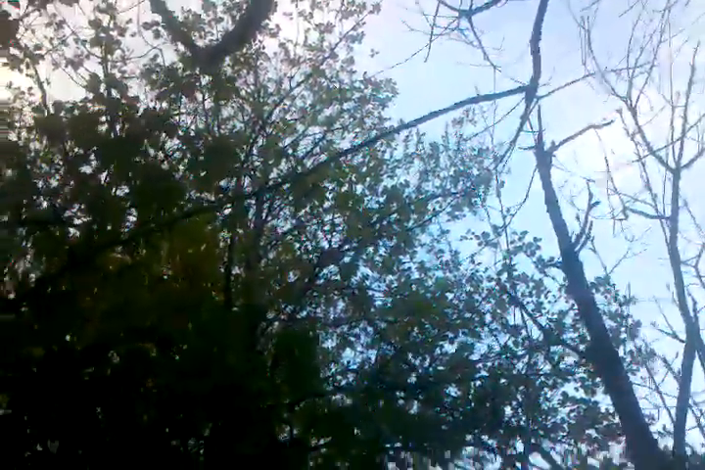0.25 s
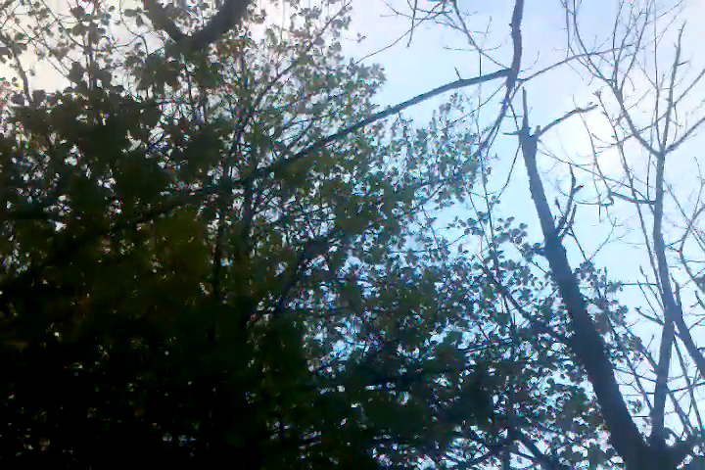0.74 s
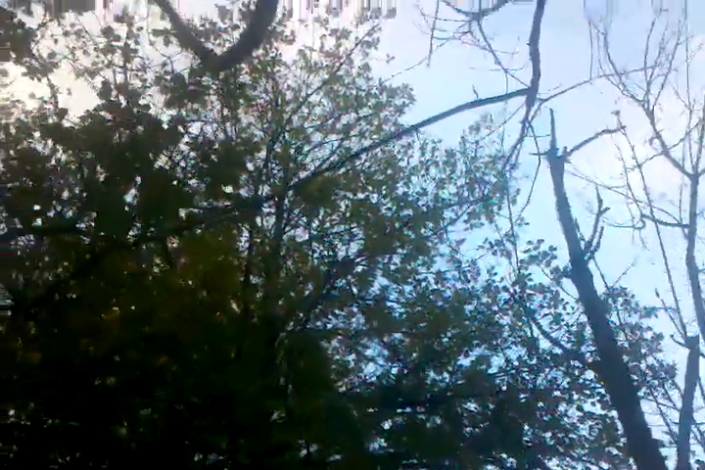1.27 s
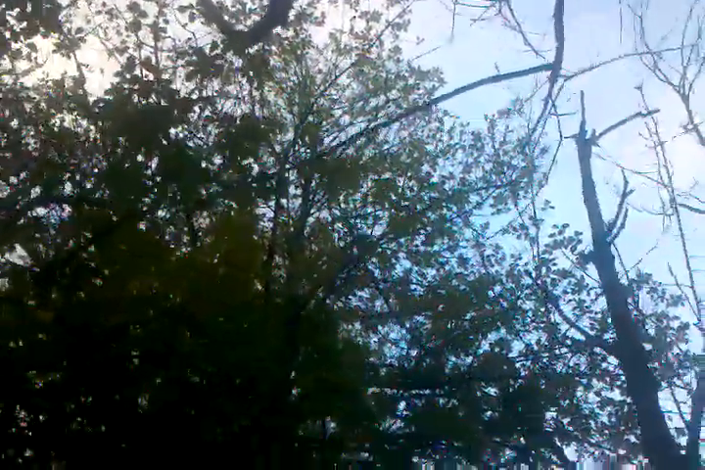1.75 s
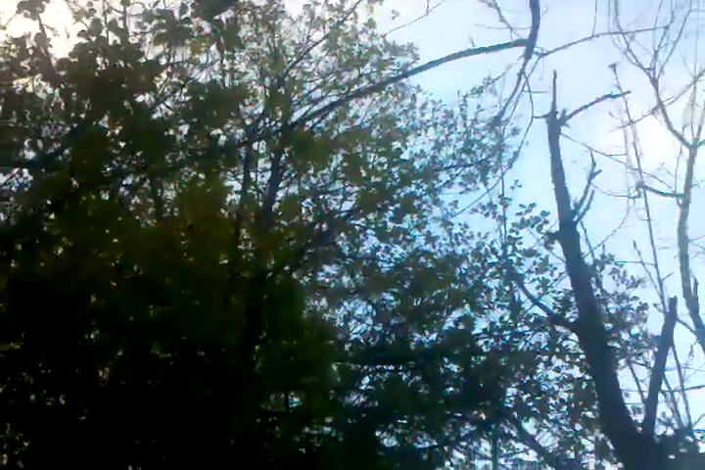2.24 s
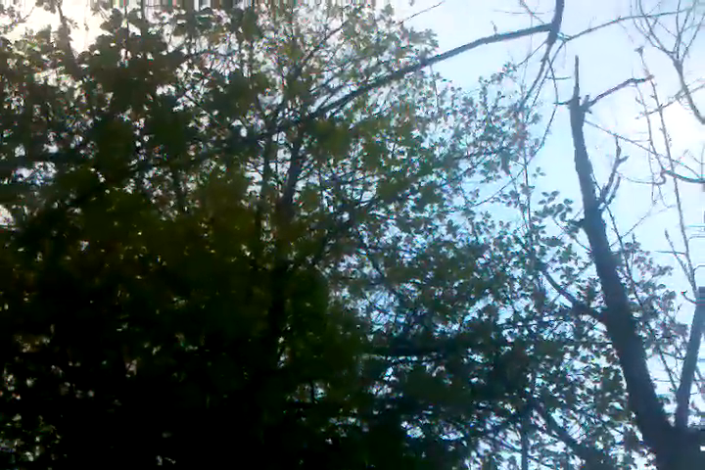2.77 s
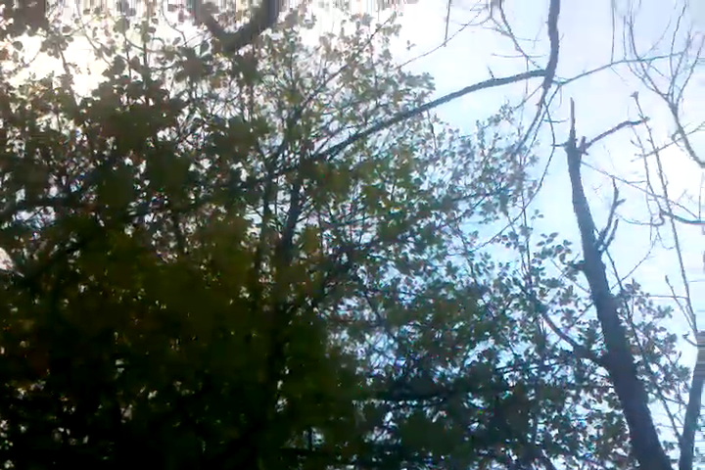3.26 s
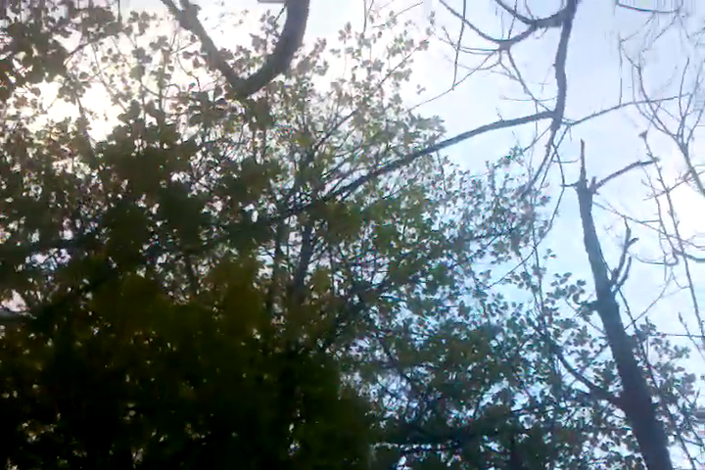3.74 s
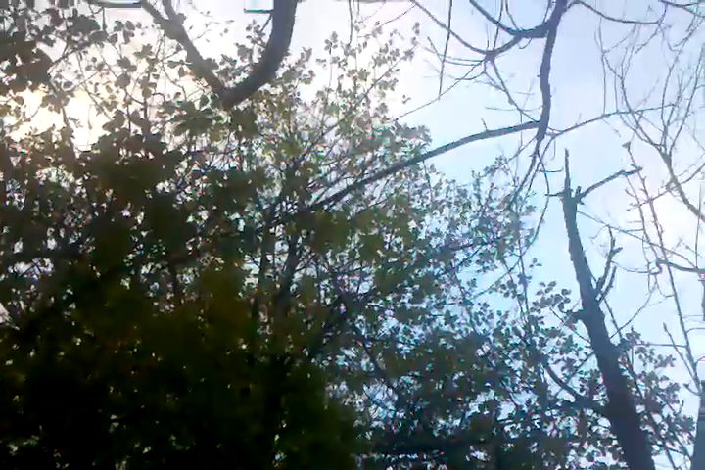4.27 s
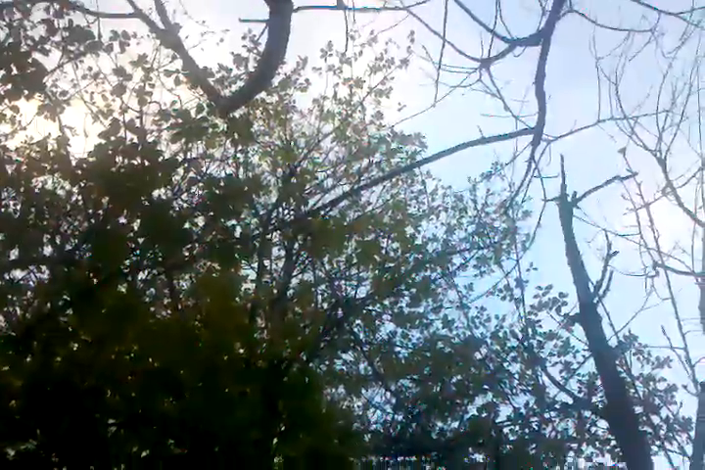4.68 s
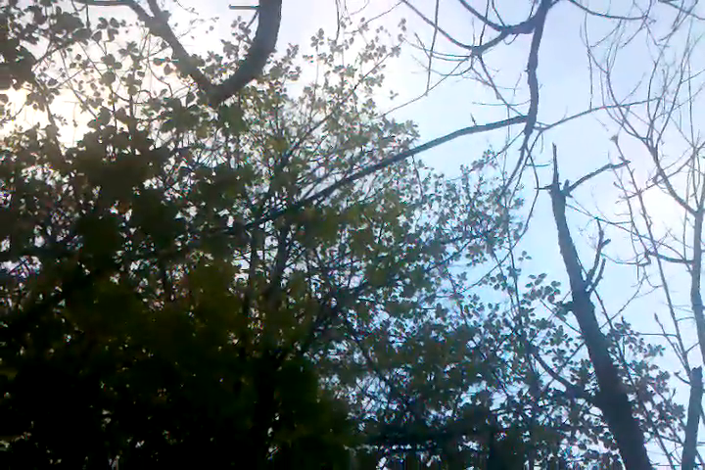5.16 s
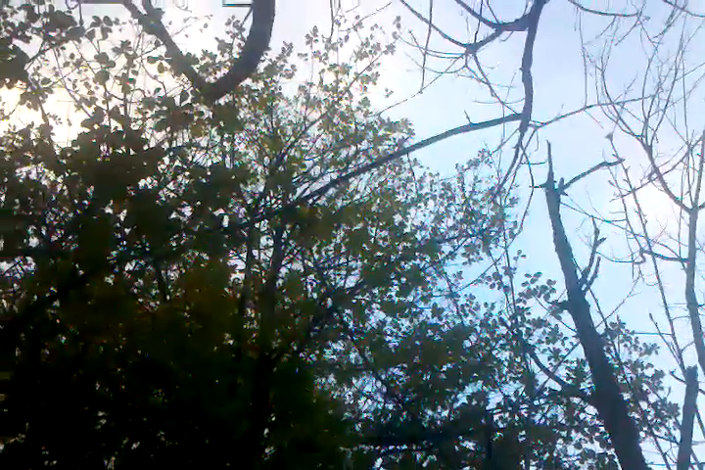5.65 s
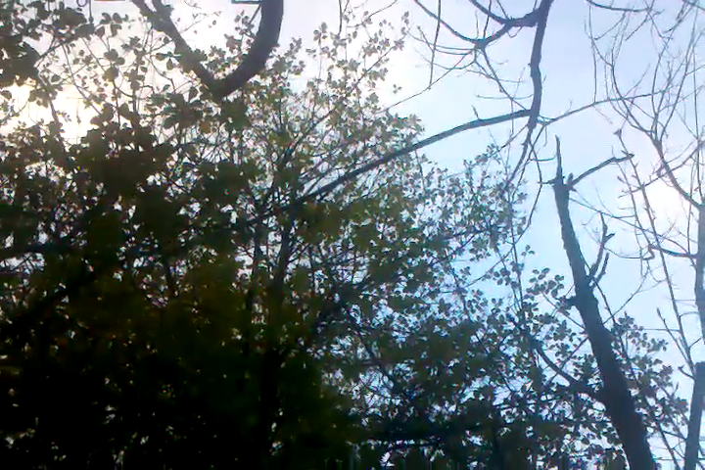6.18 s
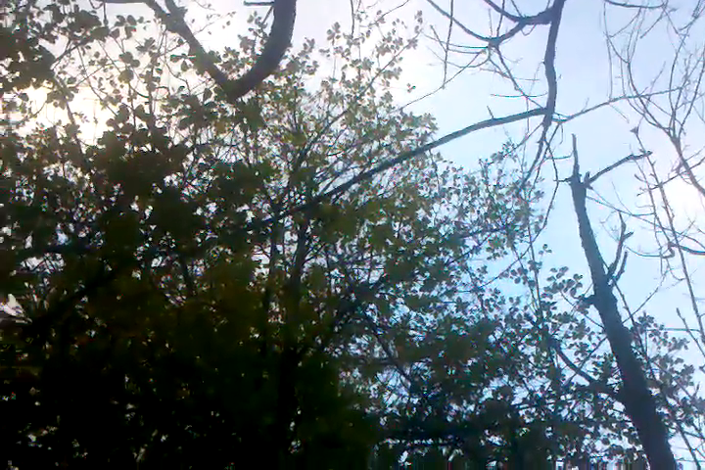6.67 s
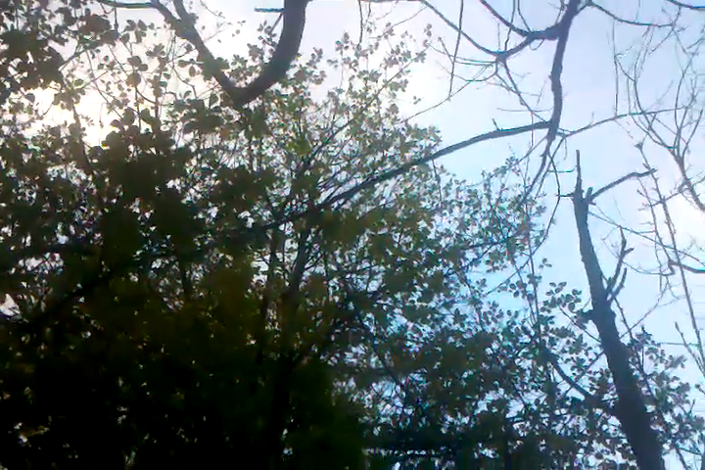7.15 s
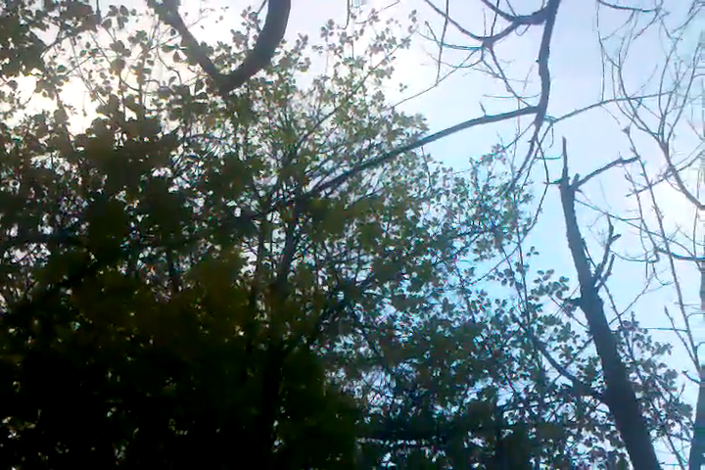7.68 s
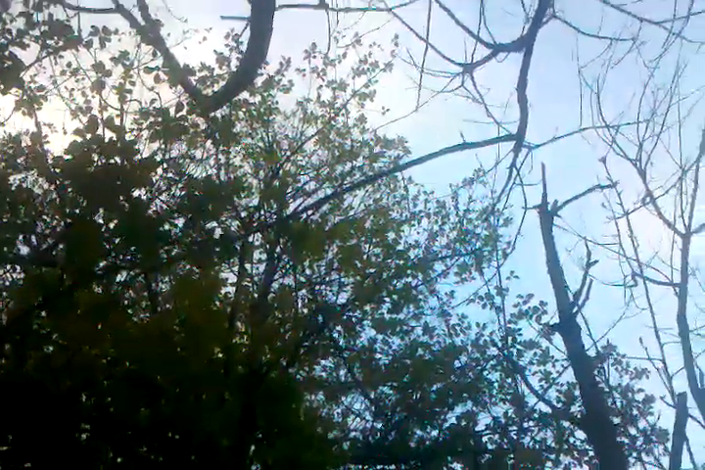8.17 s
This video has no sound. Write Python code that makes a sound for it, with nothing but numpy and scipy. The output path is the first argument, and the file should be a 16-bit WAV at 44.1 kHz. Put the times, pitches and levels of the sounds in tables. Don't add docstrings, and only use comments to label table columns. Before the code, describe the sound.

A close mockingbird runs through repeated chirps, buzzy falling notes, peaked whistles, fast trills and sharp chips over soft street rumble and a low hum.

```python
import sys
import numpy as np
from scipy import signal
from scipy.fft import rfft, irfft, next_fast_len
from scipy.io import wavfile
from scipy.ndimage import uniform_filter1d

SR = 44100
rng = np.random.default_rng(int(sys.argv[2]) if len(sys.argv) > 2 else 0)


def pcm_store(signal):
    levels = np.round(np.clip(np.atleast_2d(signal), -1, 1) * 32767)
    wavfile.write(sys.argv[1], SR, levels.astype(np.int16).T)


def elevation(decibels):
    levels = np.asarray(decibels, float)
    return 10 ** (levels / 20)


N = 371322
TIME = np.arange(N) / SR

# share of length, share of glide, level/dB
SLIDE = [(0, 0, -3), (.2, 0.31, 2.5), (.7, 0.91, 0), (1, 0.85, 0)]


def shaped(x, points):
    hz, db = np.transpose(points)
    size = next_fast_len(N)
    bins_hz = np.maximum(np.fft.rfftfreq(size, 1 / SR), 1)
    gain = elevation(np.interp(np.log(bins_hz), np.log(hz), db))
    return irfft(rfft(x, size) * gain, size)[:N]


def unit(x):
    return x / np.sqrt(np.mean(x ** 2))


def walk(rate_hz, size=N):
    hold = int(SR / rate_hz)
    steps = np.repeat(rng.standard_normal(size // hold + 1), hold)
    return 1.32 * uniform_filter1d(uniform_filter1d(steps, hold), hold)[:size]


def street():
    # f/Hz, density/dB per Hz
    bed_colour = [(25, -53.5), (45, -35.5), (70, -19), (110, -6.5), (190, -2), (450, -7.5), (700, -5.5),
                  (970, -1), (1350, -4), (1760, -7), (2230, -14), (6600, -16.5), (7100, -23.5),
                  (7600, -37.5), (8100, -61)]
    # t/s, engines/dB, tyres/dB, leaf hiss/dB
    swell = [(0.0, -46, -45.5, -57.5), (0.909, -45, -43.5, -52), (4.241, -46, -43, -57),
             (6.171, -45, -43.5, -52), (8.35, -44, -42.5, -54), (8.42, -43, -43.5, -52)]
    # t/s, level/dB
    gusts = [(0, -81), (3.9, -77), (5.3, -73.5), (5.6, -69.5), (6.2, -65), (6.6, -71), (6.9, -76.5),
             (7.5, -70), (8.42, -75)]
    # f/Hz, level/dB
    mains = [(118.4, -56)]
    s, *columns = np.transpose(swell)
    engines_db, tyres_db, leaves_db = (np.interp(TIME, s, c) for c in columns)
    bed = shaped(rng.standard_normal(N), bed_colour)
    low, mid, high = (signal.sosfiltfilt(signal.butter(8, hz, fs=SR, output="sos"), bed)
                      for hz in (700, 1900, 7500))
    buffet_colour = [(20, -44.5), (35, -23.0), (55, -2.5), (80, -11.0), (130, -43.0)]
    buffet = shaped(rng.standard_normal(N), buffet_colour)
    out = elevation(np.interp(TIME, *np.transpose(gusts)) + 1.5 * walk(5.2)) * unit(buffet)
    mic_hiss_db = -104
    layers = [(engines_db, low), (tyres_db, mid - low), (leaves_db + 6, high - mid), (mic_hiss_db, bed - high)]
    for db, band in layers:
        out += elevation(db + 0.7 * walk(9)) * unit(band)
    hum_hz, hum_db = mains[0]
    hum_level = elevation(hum_db + 2.5 + 1.7 * walk(3.2))
    return out + hum_level * np.sin(2 * np.pi * np.cumsum(hum_hz + 2.537 * walk(3)) / SR)


def ticks():
    # t/s, peak/dB, centre f/Hz, width/Hz
    snaps = [(0.36, -22, 1190, 1100), (0.382, -31, 4000, 1200), (.385, -32, 4400, 1000),
             (4.4504, -22.5, 2180, 820), (4.452, -21.5, 1094, 610), (6.237, -29, 4130, 1500),
             (4.451, -26, 4680, 900), (6.932, -25.5, 890, 400), (7.0485, -31.5, 3430, 900),
             (7.05, -30, 1310, 250), (7.093, -39, 1150, 200), (7.14, -34, 1000, 200),
             (7.161, -33.5, 1050, 200), (2.335, -37, 1103, 200), (2.578, -32.5, 900, 200),
             (2.614, -38, 1092, 200), (7.283, -30, 3300, 1190), (1.529, -29.5, 4150, 2485),
             (2.202, -33, 6000, 2490)]
    out, t = np.zeros(N), np.arange(300) / SR
    for s, db, hz, width_hz in snaps:
        ring = np.sin(2 * np.pi * hz * t) * t * np.exp(-5 * width_hz * t)
        crack = elevation(-17) * np.exp(-t / .0004) * rng.standard_normal(len(t))
        start = int(s * SR)
        out[start:start + len(t)] += elevation(db) * (ring / np.max(ring) + crack)
    return out


def throat(hz):
    # f/Hz, gain/dB
    resonance = [(1200, -36.5), (2200, -4), (3000, 0), (3700, 3), (4400, -9.5), (5400, -18.5),
                 (6200, -12.5), (7000, -10.5)]
    f, g = np.transpose(resonance)
    return np.interp(np.log(hz), np.log(f), g)


def add(out, t, hz, db, orders, waver=0.0026, throb_hz=90., throb=0., rough=0., grain_db=2.0):
    phase = 2 * np.pi * np.cumsum(hz * (1 + (waver + rough) * walk(900, size=len(t)))) / SR
    gains = [elevation(d + throat(k * hz)) * (k * hz < 9400) for k, d in orders]
    partials = sum(a * np.sin(k * phase) for a, (k, _) in zip(gains, orders))
    tone = partials / np.sqrt(sum(a ** 2 for a in gains) / 2)
    pulse = 1 - np.clip(throb, 0, 1) * np.cos(np.pi * throb_hz * (t - t[0])) ** 2
    edge = np.clip(np.minimum(t - t[0], t[-1] - t) / 0.0049, 0, 1)
    sung = tone * elevation(db + grain_db * walk(250, size=len(t))) * pulse * edge
    i = int(t[0] * SR)
    out[i:i + len(t)] += sung[:N - i]


def phrase(notes, orders, flutter=0., **voice):
    out = np.zeros(N)
    for note in notes:
        s, hz, db = np.transpose(note)
        t = np.arange(s[0] - .003, s[-1] + 0.0066, 1 / SR)
        pitch = uniform_filter1d(np.interp(t, s, hz), size=130)
        rising = uniform_filter1d(1. * (t < s[np.argmax(hz)]), size=130)
        add(out, t, pitch, np.interp(t, s, db), orders, rough=flutter * rising, **voice)
    return out


def repeats(shape, calls):
    return [[(s + at, hz * factor, db + level) for s, hz, db in shape] for at, level, factor in calls]


def humps(shape, rows):
    return [[(top + u * (rise if u < 0 else fall), hz * ratio, db + level) for u, ratio, db in shape]
            for top, rise, fall, hz, level in rows]


def glides(shape, rows):
    return [[(at + u * length, a + (b - a) * share, db + level) for u, share, db in shape]
            for at, length, a, b, level in rows]


def far_birds():
    # t/s, f/Hz, level/dB
    slur = [(0, 4202.5, -4.5), (.014, 5597.5, 7), (.022, 5298, 0.5), (.026, 4447.5, 4), (.045, 4246.5, 7),
            (.052, 3997.5, -12.5), (.065, 3699.5, 1), (.09, 3443, -3), (.125, 4095.5, -6)]
    # t/s, level/dB, pitch factor
    slur_calls = [(0.779, -50, 0.92), (2.205, -46, 0.99), (3.362, -43, 0.99), (4.635, -42.5, 0.98),
                  (5.539, -42.5, 0.97), (7.706, -40, 1.0)]
    # t/s, length/s, from f/Hz, to f/Hz, level/dB
    twitters = [(0.578, .3, 5930, 5610, -51.5), (0.841, 0.051, 3730, 3640, -45.5),
                (2.33, 0.064, 4210, 3630, -48), (7.682, 0.033, 5690, 6500, -57.5),
                (7.472, .045, 3850, 3500, -49), (5.935, 0.025, 3750, 3450, -48.5),
                (8.142, 0.081, 3520, 2920, -52)]
    twitter = phrase(glides(SLIDE, twitters), [(1, 0)], waver=.11)
    slurred = phrase(repeats(slur, slur_calls), [(0.98, 0)], waver=0.033, throb_hz=75.0, throb=0.56)
    return slurred + twitter


def chirper():
    # t/s, f/Hz, level/dB
    chirp = [(0, 2249, -15), (.015, 2418.5, -10), (.027, 2472, -0.5), (.034, 2195.5, -9), (.042, 1905, -10)]
    # t/s, level/dB, pitch factor
    chirp_calls = [(3.912, -39.5, 0.98), (4.143, -41.5, 0.94), (4.725, -36, 0.98), (4.93, -42.5, 0.93),
                   (5.548, -42.5, 0.96), (5.81, -43, 0.92), (6.33, -37, 0.99), (6.92, -40.5, 0.96)]
    # t/s, length/s, from f/Hz, to f/Hz, level/dB
    lead_ins = [
        (3.905, 0.028, 2000, 6900, -59),
        (6.312, .018, 2850, 3300, -48),
        (5.79, 0.03, 2200, 2600, -51.5),
    ]
    chirps = phrase(repeats(chirp, chirp_calls), [(1, 2.0), (2, -4.5)], waver=.018)
    return chirps + phrase(glides(SLIDE, lead_ins), [(0.99, 0)], waver=.015)


def murmurs():
    # t/s, length/s, from f/Hz, to f/Hz, level/dB
    links = [(7.386, 0.057, 2030, 2046, -45), (7.88, 0.085, 2020, 2165, -42),
             (9.8, 0.023, 3300, 2690, -42.5), (4.241, 0.02, 2700, 3600, -51.5),
             (3.1, 0.012, 4100, 2600, -46), (7.29, .012, 2100, 2620, -44), (5.046, 0.029, 3800, 3670, -51),
             (4.8, 0.01, 2500, 2900, -41)]
    return phrase(glides(SLIDE, links), [(0.99, 0)], waver=0.0054, throb_hz=45., throb=0.16)


def arches():
    # place (-1 start, 0 top, 1 end), pitch / top pitch, level/dB
    short_arch = [(-1, .78, -11), (-0.61, .93, -9.5), (-.45, .965, -4), (-0.039, 1.001, -2.1),
                  (0.24, .88, -2.5), (0.66, .69, -11.5), (1, 0.39, -13)]
    long_arch = [(-1, .68, -6), (-.8, 0.82, -8), (-0.47, .965, -4.5), (0.043, 1.001, -1.5), (.3, .89, -4.5),
                 (0.47, 0.82, 2), (0.94, 0.44, -13)]
    # top t/s, rise/s, fall/s, top f/Hz, level/dB
    short_rows = [(0.101, 0.018, 0.029, 1376, -33.5), (0.257, 0.018, 0.028, 1386, -37.5),
                  (0.416, 0.021, .029, 1364, -33.5), (0.568, 0.014, .033, 1403, -34),
                  (0.727, 0.026, 0.024, 1435, -33)]
    long_rows = [(.906, .016, 0.04, 1600, -35), (1.094, 0.028, 0.025, 1622, -32.5),
                 (1.242, 0.024, 0.028, 1592, -31), (1.421, 0.028, 0.028, 1648, -31.5),
                 (1.955, 0.034, 0.026, 1618, -31.5), (2.135, 0.03, 0.025, 1594, -34)]
    # t/s, f/Hz, level/dB
    step_arch = [(1.565, 1130, -35), (1.576, 1333, -38), (1.582, 1763, -27.5), (1.601, 1900, -28.5),
                 (1.608, 1644, -29.5), (1.615, 1260, -42), (1.627, 900, -48)]
    cracked_arch = [(1.733, 1106, -40), (1.745, 1303, -31), (1.75, 1810, -30), (1.754, 1776, -28),
                    (1.76, 1610, -38), (1.768, 1626, -25.5), (1.772, 1268, -29.5), (1.782, 970, -35),
                    (1.79, 742, -39)]
    long_upper_db = [-6.5, 3, 4, 3, 3, 2, 0, 5.5]
    upper_dbs = [2] * len(short_rows) + long_upper_db
    notes = humps(short_arch, short_rows) + humps(long_arch, long_rows) + [step_arch, cracked_arch]
    out = np.zeros(N)
    for note, upper_db in zip(notes, upper_dbs):
        orders = [(2, 0.91), (3, upper_db), (4, upper_db - 5.5), (5, upper_db - 8.5)]
        out += phrase([note], orders, waver=0.011, grain_db=2.5)
    return out


def buzz_falls():
    # place, pitch / top pitch, level/dB
    buzz = [(-1, .88, -15), (-0.376, .95, -9), (-0.0097, 1.001, -1.4), (0.96, 1.01, -4)]
    buzz_rows = [(2.976, 0.028, 0.0097, 2940, -28.5), (3.098, 0.022, 0.015, 3044, -27),
                 (3.215, 0.017, 0.018, 2960, -27.5), (3.353, 0.035, 0.0044, 2975, -27.5),
                 (3.469, 0.021, 0.022, 2920, -29.5), (3.618, 0.031, 0.015, 3018, -24.5)]
    # share of length, share of glide, level/dB
    fall = [(0, 0.042, -13), (.2, 0.34, -1.7), (.6, .76, 0.8), (1, 0.98, -12.5)]
    # t/s, length/s, from f/Hz, to f/Hz, level/dB
    fall_rows = [(2.99, 0.024, 4650, 2710, -28.5), (3.122, 0.024, 5050, 2845, -26.5),
                 (3.243, .025, 4840, 2814, -26.5), (3.369, 0.026, 4910, 2850, -24),
                 (3.499, 0.035, 4610, 3124, -28), (3.638, .033, 4870, 2950, -26)]
    buzzes = phrase(humps(buzz, buzz_rows), [(1, 0), (2, -2)], throb_hz=80., throb=.72, waver=.02, grain_db=3)
    return buzzes + phrase(glides(fall, fall_rows), [(1, 1), (2, -10.0)])


def flicks(peaked):
    ends_s = [note[-1][0] for note in peaked]
    return [[(s - .011, 7400, -46), (s - .001, 6000, -50), (s + 0.007, 4000, -52)] for s in ends_s]


def whistles():
    # place, pitch / top pitch, level/dB
    low_peak = [(-1, .71, -15), (-.8, .81, -7), (-.35, .96, -10), (0, 1, -10), (.17, .84, -3),
                (.45, .76, 1), (.7, .7, -1), (1, .58, -11)]
    high_peak = [(-1, .72, -10), (-.75, .76, -4), (-.45, .8, -6), (-.27, .97, -11), (0, 1, -9),
                 (.2, .8, -4), (.4, .71, 1), (.7, .63, -1), (1, .53, -11)]
    # top t/s, rise/s, fall/s, top f/Hz, level/dB
    low_rows = [
        (4.316, 0.025, 0.033, 5000, -29.5),
        (4.434, .039, .027, 5220, -27.5),
        (5.113, 0.031, .029, 5160, -30),
    ]
    high_rows = [
        (5.222, .036, .024, 5805, -28.5),
        (5.36, .035, 0.017, 5780, -27),
    ]
    # t/s, f/Hz, level/dB
    hushed_peak = [(4.505, 4030, -46), (4.514, 4580, -34), (4.533, 4670, -32), (4.539, 5110, -35.5),
                   (4.543, 5010, -43), (4.549, 4230, -31.5), (4.557, 3680, -28), (4.565, 3170, -45)]
    peaked = humps(low_peak, low_rows) + humps(high_peak, high_rows) + [hushed_peak]
    return phrase(peaked, [(1, 0), (2, -14)], flutter=.045) + phrase(flicks(peaked), [(0.89, 0)])


def trills():
    # top t/s, top f/Hz, next valley f/Hz, level/dB
    swings = [
        [(5.988, 4000, 4100, -47), (6.004, 6100, 3330, -35.5), (6.0375, 5800, 3250, -31),
         (6.064, 6000, 3400, -31.5), (6.0955, 5900, 3500, -29.5), (6.1255, 5500, 3340, -29),
         (6.158, 5500, 3396, -31), (6.19, 5200, 3900, -30), (6.213, 4200, 4100, -40)],
        [(6.513, 4200, 4250, -44), (6.537, 6200, 3270, -33.5), (6.5645, 6100, 3490, -28.5),
         (6.5935, 6300, 3610, -25.5), (6.621, 6300, 3425, -28.5), (6.652, 6250, 3410, -26),
         (6.684, 6000, 3420, -24), (6.7135, 5900, 3375, -27.5), (6.7435, 5900, 3400, -27.5),
         (6.772, 5900, 3810, -25), (6.797, 4700, 4400, -33)],
    ]
    out = np.zeros(N)
    for rows in swings:
        s, top, valley, db = np.transpose(rows)
        t = np.arange(s[0], s[-1], 1 / SR)
        place = np.interp(t, s, np.arange(len(s)))
        k, u = place.astype(int), place % 1
        height = np.minimum(.85 * (2 * u - 1) ** 2 + .6 * (2 * u - 1) ** 6, 1)
        nearest_top = np.where(u < .5, top[k], top[np.minimum(k + 1, len(s) - 1)])
        pitch = valley[k] + (nearest_top - valley[k]) * height
        effort_db = np.interp(t, s, db) - 4.7 * height ** 2 - 6 * (1 - height) ** 6
        effort_db += 1.5 * np.sin(2 * np.pi * u) - 8 * np.exp(-((u - .06) / .035) ** 2)
        pitch = uniform_filter1d(pitch, size=90)
        add(out, t, pitch, effort_db, [(1, 1.5), (2, -3.5)], waver=0.013, grain_db=2.2)
    return out


def chips():
    # place, pitch / top pitch, level/dB
    chip = [(-0.83, .78, -16), (-.45, .88, -7), (0, 1.001, -1.1), (0.37, .9, -15), (.42, .73, -8.5),
            (0.99, .64, -19)]
    chip_rows = [
        (7.315, 0.02, 0.038, 3130, -31),
        (7.852, .027, 0.027, 3330, -29.5),
        (8.401, 0.021, .034, 3310, -32),
    ]
    # t/s, f/Hz, level/dB
    spiked_chip = [(7.542, 2590, -42), (7.557, 2930, -25.5), (7.565, 3830, -32.5), (7.571, 2720, -38),
                   (7.586, 2410, -42), (7.609, 2420, -49)]
    loud_chip = [(8.066, 2740, -37.5), (8.08, 3260, -27.5), (8.092, 3570, -31.5), (8.099, 2940, -25),
                 (8.113, 2970, -46), (8.122, 2570, -40.5), (8.134, 2530, -52)]
    notes = humps(chip, chip_rows) + [spiked_chip, loud_chip]
    return phrase(notes, [(1, 0.0), (2, -4.5)], waver=0.0059)


def mockingbird():
    return arches() + buzz_falls() + whistles() + trills() + chips() + murmurs()


def foliage(x, direct_db, echo_db, near_db, near_t60, far_db, far_t60):
    # delay/s, level/dB
    echoes = [
        (.0055, -7),
        (.009, -11),
        (0.02, -20),
    ]
    t = np.arange(SR // 2) / SR
    response = np.zeros(len(t))
    for db, t60 in [(near_db, near_t60), (far_db, far_t60)]:
        scatter = rng.standard_normal(len(t)) * 1000 ** (-t / t60) * (t > .003)
        response += elevation(db) * unit(scatter) / np.sqrt(len(t))
    response[0] = elevation(direct_db)
    for delay_s, db in echoes:
        response[int(delay_s * SR)] += elevation(db + echo_db)
    return signal.fftconvolve(x, response)[:N]


def scene():
    chirps = elevation(-4) * chirper()
    near = foliage(mockingbird() + chirps, direct_db=0, echo_db=-2.,
                   near_db=-10, near_t60=.055, far_db=-16, far_t60=.55)
    far = foliage(far_birds() + chirps, direct_db=-1.5, echo_db=0.,
                  near_db=-2.5, near_t60=.15, far_db=-6, far_t60=.5)
    snaps = foliage(ticks(), direct_db=3.5, echo_db=-10.0,
                    near_db=-9.0, near_t60=0.058, far_db=-28.5, far_t60=.3)
    mic_response = [(60, -49), (300, -11.5), (600, -0.5), (6900, 2.5), (7700, -30), (8000, -75)]
    return (shaped(near + far + snaps, mic_response) + street())[None]


def band_limit(x):
    return signal.sosfilt(signal.butter(12, 9180, fs=SR, output="sos"), x)


def record(dry):
    converter_hz, mirror_db = 16000, -38.5
    mix = dry * (1 + elevation(mirror_db) * 2 * np.cos(2 * np.pi * converter_hz * TIME))
    return band_limit(mix)


dry = scene()
out = record(dry)
pcm_store(out)
```